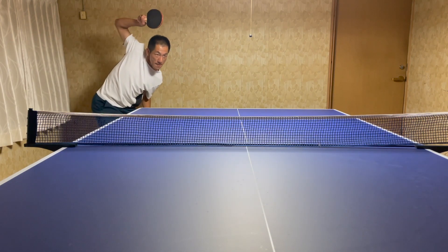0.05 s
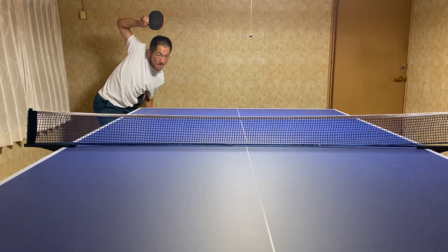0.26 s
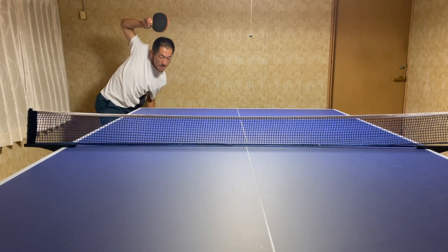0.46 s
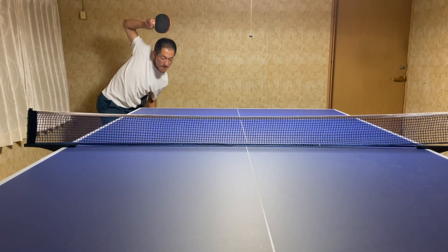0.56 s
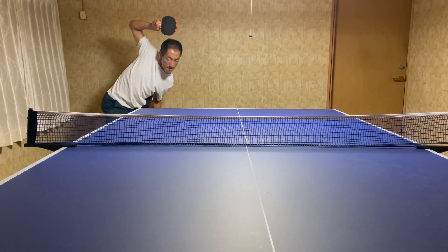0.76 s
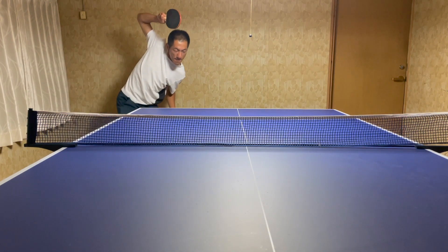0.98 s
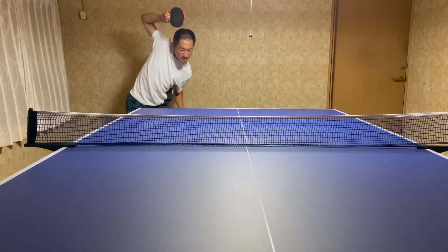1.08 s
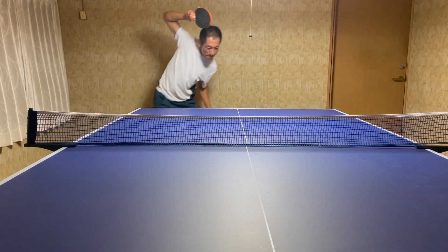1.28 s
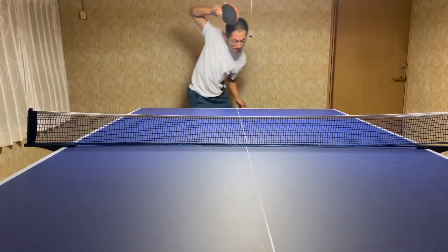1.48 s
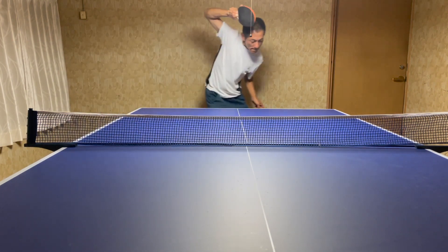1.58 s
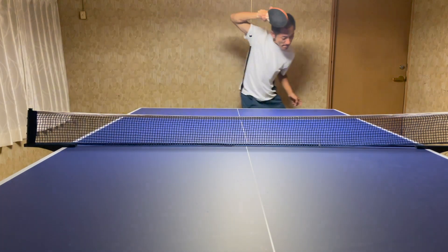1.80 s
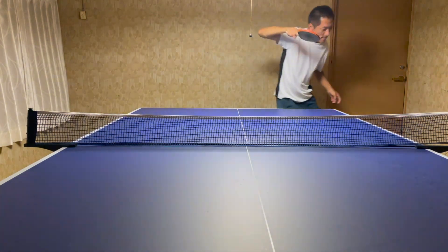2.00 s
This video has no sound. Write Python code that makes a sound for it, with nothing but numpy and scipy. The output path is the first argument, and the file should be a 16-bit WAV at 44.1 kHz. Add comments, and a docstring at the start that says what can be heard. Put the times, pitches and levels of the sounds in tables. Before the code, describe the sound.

In a small, bare room, a table tennis ball bounces once before a paddle swishes and hits it. A sharp clack and a duller, more distant knock follow, while clothes rustle and quick steps boom on wooden boards.

```python
"""Over a faint rumble and rustle, a table tennis ball bounces on the table in a small, bare room.
A paddle swishes and hits it; it clacks on a hard edge and drops further off. At each hit the
struck object knocks, the contact cracks and the hollow ball pings. A player in rustling clothes
steps across the booming wooden floor, and every blow rings on in the room."""
import sys
import numpy as np
from scipy import signal
from scipy.fft import rfft, irfft
from scipy.io import wavfile

SR = 44100
rng = np.random.default_rng(int(sys.argv[2]) if len(sys.argv) > 2 else 0)


def file_out(sig):
    """Save sig as 16-bit WAV at sys.argv[1]."""
    # one column per channel
    cols = np.atleast_2d(sig).T
    # limit, then scale
    lim = np.clip(cols, -1, 1)
    pcm = np.round(lim * 32767).astype(np.int16)
    wavfile.write(sys.argv[1], SR, pcm)


N = 90404
AGE = np.arange(SR) / SR   # seconds since a blow

# How loud each noise is. Each row: time in seconds, level in dB.
RUMBLE_LEVEL = [(0, -57.5), (.2, -60.5), (.56, -62), (.7, -66), (.9, -50.5), (1.2, -58), (1.5, -38.5),
                (1.75, -50.5), (1.87, -53.5), (2.05, -49)]
CLOTH_LEVEL = [(0, -93.5), (.11, -103.5), (.13, -69), (.2, -87.5), (.6, -98), (.77, -78), (.83, -51.5),
               (.9, -57), (1.04, -61), (1.12, -52.5), (1.19, -59.5), (1.27, -51), (1.44, -50.5),
               (1.56, -51), (1.65, -55.5), (1.72, -52.5), (1.85, -52.5), (2.05, -56)]
SWING_LEVEL = [(.595, -86.5), (.612, -53.5), (.65, -44.5), (.67, -87)]
# How dull or bright each noise is. Each row: frequency in Hz, relative level in dB.
RUMBLE_TONE = [(20, -28), (35, -15), (52, -2.5), (90, -4), (140, -11.5), (250, -23), (600, -27),
               (1500, -29), (4000, -45.5), (16000, -61.5)]
CLOTH_TONE = [(150, -1), (400, 8), (900, 1.5), (2000, 1), (4000, 3), (6500, -0.5), (8500, -2), (11500, 1.5),
              (14000, -2.5), (16000, -11)]
SWING_TONE = [(60, -9), (150, -0.5), (380, 1.5), (600, -22), (1200, -22.5), (2500, -45), (8000, -57)]
# How alike left and right are. Each row: frequency in Hz, likeness (1 is equal, -1 or less opposite).
STEREO_LIKENESS = [(60, .97), (170, 0.87), (330, 0.69), (600, 0.27), (1100, -0.038), (1800, 0.19),
                   (3000, 0.36), (5000, 0.22), (7400, -0.12), (8600, -1.38), (9800, -0.69), (11200, -0.056),
                   (13500, 1)]

# How long the room echoes. Each row: frequency in Hz, seconds to fade by 60 dB.
ROOM_FADE = [(60, 0.66), (150, 0.47), (350, 0.33), (800, 0.37), (1600, 0.39), (3500, 0.34), (8000, 0.36),
             (15000, 0.17)]
# Which side the room's echo favours. Each row: frequency in Hz, left minus right in dB.
ROOM_SIDE = [(300, 0), (700, 0), (1400, 1), (2800, 2.5), (5500, 2.5), (9000, 0)]
# Notes that ring between the walls. Each row: pitch in Hz, gain in dB, fade time in seconds.
ROOM_NOTES = [(144, -17.5, 0.3), (240, 2, 0.65), (339, -9, 1), (369.5, -3.5, 0.79), (456.4, 1.5, 0.37),
              (561, 5.5, .35), (707, -3, 0.87), (745, -9.5, 0.41), (1047, -5.5, 0.11), (1279, -3.5, 0.41),
              (1666, -4, 0.3), (1730, -1.5, .3)]

# Notes of struck objects. Each row: pitch in Hz, relative energy in dB, fade time in seconds.
TABLE_NOTES = [(162, -12, 0.02), (274.4, -2, 0.04), (352.4, 3.5, 0.13), (464.4, 5, 0.056), (608, 3.5, 0.01),
               (741, 4.5, 0.017), (1020, 4.5, 0.017), (1284, 0.5, 0.031), (1441, 2.5, 0.034),
               (1796, 0, 0.0088), (2860, -3, 0.0038), (3220, -2, 0.01)]
PADDLE_NOTES = [(81.5, -9.5, 0.16), (269, -4, .04), (404, 4, 0.034), (550, 3.5, 0.019), (690, 3.5, 0.018),
                (1050, 0.5, 0.014), (1327, -6, 0.025), (1676, -8, 0.005), (2500, -46, 0.024)]
BOOM_NOTES = [(56.2, 1.7, 0.29), (61.1, 4, 0.45), (84, 3.6, 0.29)]
THUD_NOTES = [(112.4, -6, 0.099), (141, -2, 0.084), (192, -6, 0.046), (232.5, -4, 0.038)]
HEEL_NOTES = [(277, 2, 0.041), (360, 2, 0.038), (474, -0.5, 0.013), (760, -5, 0.017), (1180, -11, 0.0052)]
EDGE_NOTES = [(102, -9, 0.11), (350, -2.5, 0.019), (545, -0.5, .025), (688, -2, 0.021), (1500, -4, 0.0065),
              (2300, -14.5, 0.0083), (3660, -9, .005), (5170, -10.5, 0.0035)]
DROP_NOTES = [(395, -7, 0.016), (588, -2.5, 0.033), (770, -6.5, 0.014), (1027, -5, 0.037),
              (1320, -6, 0.0094), (1780, -13, 0.01), (2880, -18.5, 0.0054)]
# Notes of the ball's shell. Each row: as above, then the gain towards the listener in dB.
SHELL_NOTES = [(7780, -8, 0.019, -5), (8100, -1, 0.014, -4.5), (9650, -1, .011, 6),
               (10900, -3, 0.0061, 3.5), (11520, -7, 0.014, -1), (12260, -4.5, 0.0077, 0),
               (14300, -12, 0.0061, -2)]
# Table bounces. Each row: start in seconds, knock in dB, ping in dB. Of the first, only echo is heard.
TABLE_BOUNCES = [(-0.21, 0, 1), (0.2404, -2, -1.5)]
# Footfalls. Each row: start in seconds, then floor boom, thud, heel knock and sole scuff in dB.
FOOTFALLS = [(0.662, -14, -29, -15.5, -45), (1.021, -17, -17, -12.5, -24), (1.086, -8.5, -23.5, -40, -36),
             (1.211, -6.5, -19, -12.5, -32), (1.224, -19, -15, -5, -16), (1.255, -15, -22.5, -15, -26),
             (1.294, -8, -20, -38, -39), (1.414, -25, -16.5, -14, -12.5), (1.526, -1.5, -2, -0.5, -19),
             (1.546, -14, 3.5, -7.5, -37), (1.684, -10.5, -15, -16.5, -15), (1.742, -11, -15.5, -32, -27)]


def amp(db):
    """Turn decibels into a gain."""
    return 10 ** (np.asarray(db) / 20)


def unit(x):
    """Scale to an average energy of one per channel."""
    return x / np.sqrt(np.mean(np.sum(x ** 2, axis=-1)) + 1e-20)


def at_hz(points, hz):
    """Read a table between its rows, on a log-frequency scale."""
    row_hz, value = np.transpose(points)
    return np.interp(np.log(hz + 1e-9), np.log(row_hz), value)


def in_time(points):
    """Read a curve at every sample."""
    return np.interp(np.arange(N) / SR, *np.transpose(points))


def add(out, sound, start_s):
    """Mix a sound in at its start time."""
    start = int(round(start_s * SR))
    first, end = max(start, 0), min(start + sound.shape[-1], N)
    out[:, first:end] += sound[:, first - start:end - start]


def delayed(sound, seconds):
    """The same sound, a little later."""
    return np.pad(sound, (int(round(seconds * SR)), 0))[:SR]


def fade(seconds):
    """Die away by 60 dB in the given time."""
    return np.exp(-np.minimum(np.log(1000) * AGE / seconds, 60))


def ring(notes):
    """A struck object rings with fading sine waves of alternating sign."""
    return sum((-1) ** k * amp(db) * unit(np.sin(2 * np.pi * hz * AGE) * fade(fade_s))
               for k, (hz, db, fade_s) in enumerate(notes))


def wide_noise(size, tone=None, grain=0):
    """Stereo noise from all sides; grain makes it rougher."""
    hz = np.fft.rfftfreq(size, 1 / SR)
    alike = np.clip(at_hz(STEREO_LIKENESS, hz), -.99, .99)
    mid, side = rfft(rng.standard_normal((2, size)) * np.exp(grain * rng.standard_normal(size)))
    pair = np.sqrt(1 + alike) * mid + np.sqrt(1 - alike) * side * np.array([[1], [-1]])
    noise = irfft(pair * (1 if tone is None else amp(at_hz(tone, hz))), size)
    return noise / noise.std()


def rumble():
    """The room and floor give a low rumble that swells and sinks."""
    return amp(in_time(RUMBLE_LEVEL)) * wide_noise(N, RUMBLE_TONE)


def clothes():
    """Moving cloth makes a grainy rustle."""
    return amp(in_time(CLOTH_LEVEL)) * wide_noise(N, CLOTH_TONE, grain=0.42)


def room_echo(sound, gap_s=0.00076, build_s=0.0039):
    """The walls return a fresh blur of echoes for each blow, and the room's own notes ring."""
    hz = np.fft.rfftfreq(SR, 1 / SR)
    spectrum = rfft(wide_noise(SR, grain=0.36)) * amp(at_hz(ROOM_SIDE, hz) * np.array([[.5], [-.5]]))
    blur = np.zeros((2, SR))
    for band_hz, fade_s in ROOM_FADE:
        band = at_hz([(row_hz, row_hz == band_hz) for row_hz, _ in ROOM_FADE], hz)
        blur += irfft(spectrum * band, SR) * fade(fade_s)
    blur = unit(blur * np.clip((AGE - gap_s) / build_s, 0, 1))
    notes = np.zeros(SR)
    for note_hz, db, fade_s in ROOM_NOTES:
        gain = amp(db) * 2 * np.log(1000) / (fade_s * SR)   # long notes build up, so start weaker
        notes += gain * np.cos(2 * np.pi * note_hz * AGE) * fade(fade_s)
    return signal.fftconvolve(sound[None], blur + notes, axes=1)[:, :SR]


def ball_hit(notes, knock_db, ping_db, crack_db, crack_hz, crack_octaves, direct_db, left_lag_s):
    """The struck object knocks, the contact cracks and the ball's shell pings; the room answers."""
    ping_lag_s, ping_left_lag_s = .0007, .00016
    band_hz = np.clip(crack_hz * 2 ** (np.array([-.5, .5]) * crack_octaves), 20, SR * .45)
    click = (AGE == 0) + 1e-18
    crack = amp(crack_db) * unit(signal.sosfilt(signal.butter(2, band_hz, "band", fs=SR, output="sos"),
                                                click))
    knock = amp(knock_db) * ring(notes)
    ping = ring([(hz, db, fade_s) for hz, db, fade_s, _ in SHELL_NOTES])
    ping = amp(ping_db) * delayed(ping, ping_lag_s)
    aimed_ping = ring([(hz, db + aim_db, fade_s) for hz, db, fade_s, aim_db in SHELL_NOTES])
    aimed_ping = amp(ping_db) * delayed(aimed_ping, ping_lag_s)
    # Sound that comes straight to the listener; a loud ping stands out more here.
    body = amp(direct_db) * (knock + amp(2) * crack)
    shell = amp(direct_db + 10 + min(ping_db, 0)) * aimed_ping
    left = delayed(body, left_lag_s) + delayed(shell, ping_left_lag_s)
    right = body + shell
    near_echoes = amp(-11) * sum(delayed(right, seconds) for seconds in (.0057, .0098))
    return np.array([left, right]) + near_echoes + room_echo(knock + crack + ping)


def table_bounce(knock_db, ping_db):
    """The ball bounces on the table with a bright ping."""
    return ball_hit(TABLE_NOTES, knock_db, ping_db, crack_db=-10.5, crack_hz=3297.5,
                    crack_octaves=1.5, direct_db=-8, left_lag_s=.0003)


def swing():
    """The swinging paddle makes a soft, low swish."""
    return amp(in_time(SWING_LEVEL)) * wide_noise(N, SWING_TONE)


def paddle_hit():
    """The rubber-faced paddle knocks with hardly any ping."""
    return ball_hit(PADDLE_NOTES, knock_db=0, ping_db=-21.5, crack_db=-19, crack_hz=3100,
                    crack_octaves=2, direct_db=-11.5, left_lag_s=.0005)


def footsteps(scuff_rise_s=0.0036, scuff_fade_s=0.19, direct_db=-4):
    """Each foot sets the floor booming, knocks and scuffs; a soft sole dulls the blow."""
    out = np.zeros((2, N))
    boom, thud, heel = (unit(ring(notes)) for notes in (BOOM_NOTES, THUD_NOTES, HEEL_NOTES))
    soft_sole = signal.butter(1, 2000, fs=SR, output="sos")
    scuff_shape = (1 - np.exp(-AGE / scuff_rise_s)) * fade(scuff_fade_s)
    for start_s, boom_db, thud_db, heel_db, scuff_db in FOOTFALLS:
        blow = signal.sosfilt(soft_sole, amp(thud_db) * thud + amp(heel_db) * heel)
        scuff = amp(scuff_db) * unit(wide_noise(SR, CLOTH_TONE) * scuff_shape)
        add(out, amp(boom_db) * boom + amp(direct_db) * blow + room_echo(blow) + scuff, start_s)
    return out


def edge_hit():
    """The ball meets a hard edge with a sharp clack."""
    return ball_hit(EDGE_NOTES, knock_db=-3.5, ping_db=-10.5, crack_db=-2.5, crack_hz=3441,
                    crack_octaves=0.94, direct_db=-2.5, left_lag_s=.00021)


def ball_drop():
    """The ball lands further off with a duller knock."""
    return ball_hit(DROP_NOTES, knock_db=-3, ping_db=-17.5, crack_db=-20, crack_hz=2297,
                    crack_octaves=4, direct_db=-4, left_lag_s=.0003)


def scene():
    """Mix the ball and feet with the rumble, rustle and swish."""
    out = clothes() + rumble() + swing()
    for start_s, knock_db, ping_db in TABLE_BOUNCES:
        add(out, table_bounce(knock_db, ping_db), start_s)
    add(out, paddle_hit(), start_s=0.6522)
    add(out, edge_hit(), start_s=0.9225)
    add(out, ball_drop(), start_s=1.3025)
    return out + footsteps()


def record(dry, lowest_hz=35, highest_hz=16300):
    """Cut the deepest bass and the highest treble."""
    dry = signal.sosfilt(signal.butter(2, lowest_hz, "high", fs=SR, output="sos"), dry)
    return signal.sosfilt(signal.ellip(10, .2, 80, highest_hz, fs=SR, output="sos"), dry)


dry = scene()
out = record(dry)
file_out(out)
```